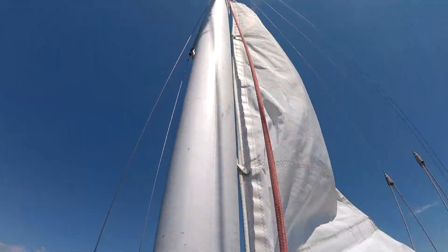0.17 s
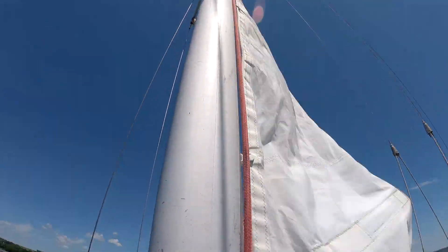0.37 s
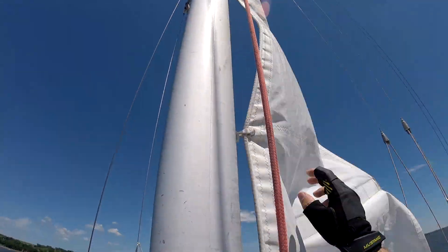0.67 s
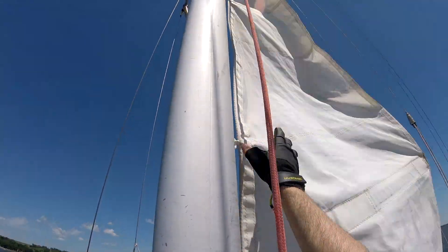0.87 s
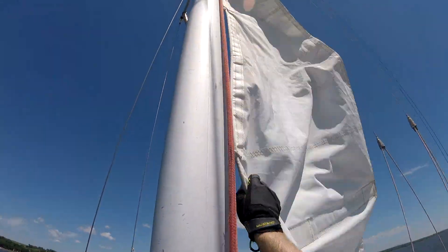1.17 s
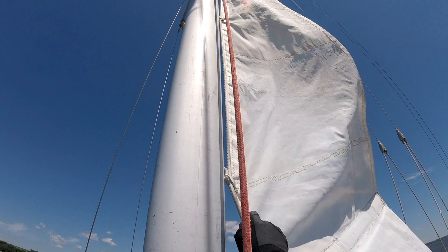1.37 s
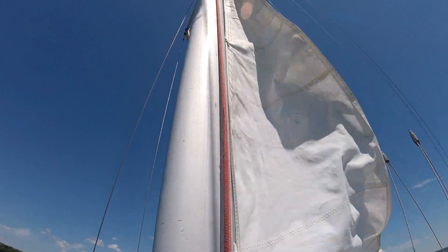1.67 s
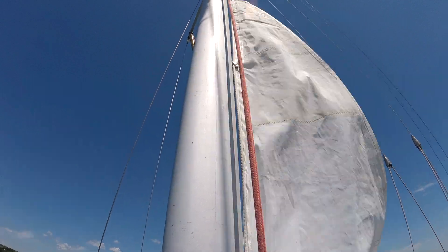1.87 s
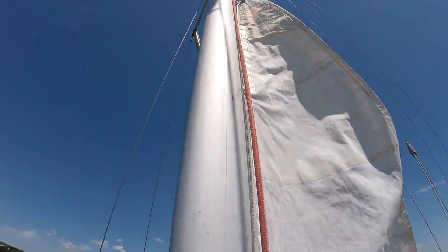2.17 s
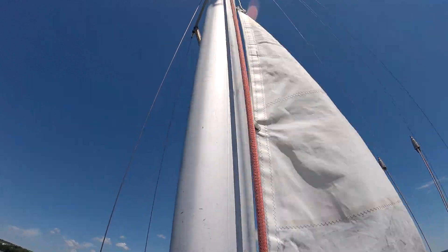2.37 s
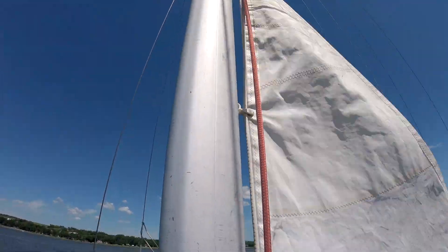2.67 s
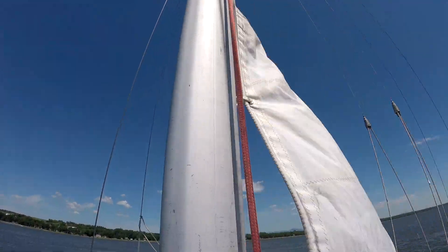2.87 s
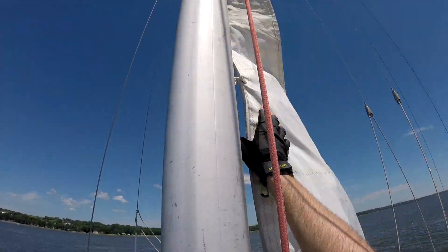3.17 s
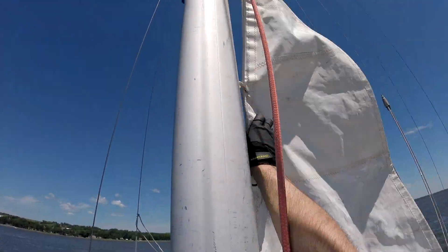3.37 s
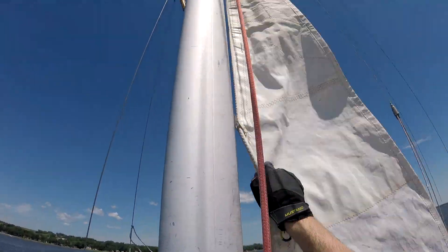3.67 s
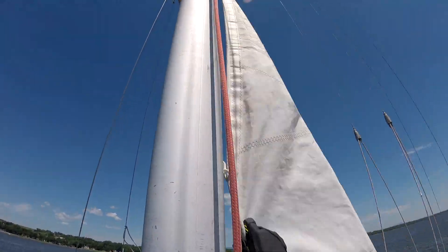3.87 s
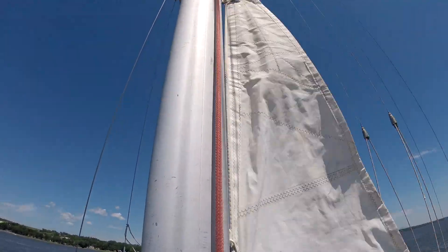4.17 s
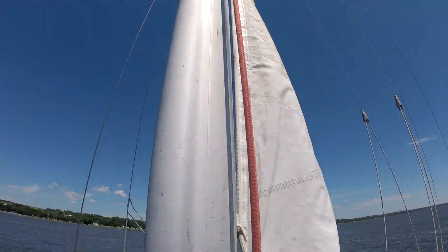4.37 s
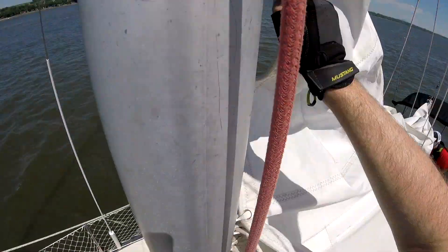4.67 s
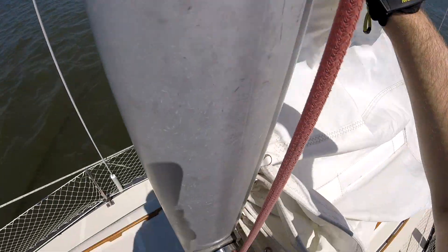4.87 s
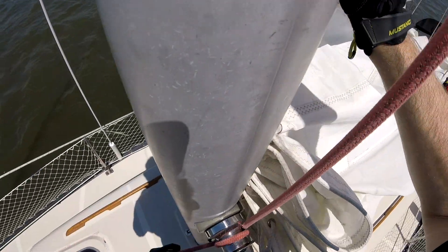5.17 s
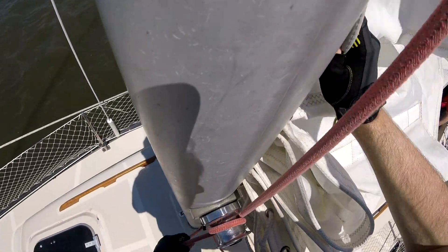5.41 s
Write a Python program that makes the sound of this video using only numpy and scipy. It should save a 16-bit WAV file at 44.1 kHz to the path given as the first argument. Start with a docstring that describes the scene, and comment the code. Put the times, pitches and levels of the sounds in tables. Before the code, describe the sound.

Wind rumbles and buffets on the microphone throughout, out on open water. An arm's length away a sail is pulled down a metal mast: the stiff cloth crinkles, hisses along its track and snaps in quick, uneven flaps, while its slides knock with a faint metallic ring. Near the end the snapping stops and the wind hits the microphone head-on in ragged, crackling gusts.

```python
"""Lowering a sail in a fresh breeze

A sail is hauled down an aluminium mast by hand, an arm's length from the microphone.
Wind rumbles and buffets on the microphone port. Stiff cloth crinkles, hisses down its track
and snaps, and its slides ring the mast. Near the end the microphone turns into the wind
and the flow tears across it."""
import sys
import numpy as np
from scipy import signal
from scipy.fft import rfft, irfft, next_fast_len
from scipy.io import wavfile
from scipy.ndimage import uniform_filter1d, minimum_filter1d, map_coordinates

SR = 44100
rng = np.random.default_rng(int(sys.argv[2]) if len(sys.argv) > 2 else 0)


def waveform_to_disk(signal):
    """Save audio, clipped to [-1, 1], as 16-bit WAV at the path in sys.argv[1]."""
    frames = np.transpose(np.atleast_2d(signal))
    scaled = np.clip(frames, -1, 1) * 32767
    samples = np.round(scaled).astype(np.int16)
    wavfile.write(sys.argv[1], SR, samples)


N = 244314


def undb(db):
    """Decibels to gain."""
    return 10 ** (np.asarray(db) / 20)


def unit(x):
    """Scale to rms 1."""
    return x / np.sqrt(np.mean(x ** 2) + 1e-18)


def gains(table, fade_s=0.02):
    """The dB columns of a curve as gains per sample, fading out beyond its ends."""
    time_s, *columns = np.transpose(table)
    t = np.arange(N) / SR
    inside = np.clip(1 + np.minimum(t - time_s[0], time_s[-1] - t) / fade_s, 0, 1)
    return [inside * undb(np.interp(t, time_s, db)) for db in columns]


def colour(x, points):
    """Minimum-phase filter through (Hz, dB) points; 24 dB per octave down beyond both ends."""
    size = next_fast_len(len(x) + 4096, True) // 2 * 2
    octave = np.log2(np.maximum(np.arange(size // 2 + 1) * SR / size, 1))
    hz, db = np.transpose(points)
    octaves_outside = np.abs(octave - np.clip(octave, np.log2(hz[0]), np.log2(hz[-1])))
    curve_db = np.interp(octave, np.log2(hz), db) - 24 * octaves_outside
    cepstrum = irfft(np.log(undb(curve_db)))
    cepstrum[1:size // 2] *= 2
    cepstrum[size // 2 + 1:] = 0
    response = np.exp(rfft(cepstrum))
    response = unit(np.abs(response)) * np.exp(1j * np.angle(response))
    return irfft(rfft(x, size) * response)[:len(x)]


def band(x, low_hz, high_hz, order=3):
    """Butterworth band-pass."""
    return signal.sosfilt(signal.butter(order, [low_hz, high_hz], "band", fs=SR, output="sos"), x)


def wander(rate_hz):
    """Ramps between random levels, rms 1."""
    step = max(int(SR / rate_hz), 1)
    levels = rng.standard_normal(N)[:N // step + 1]
    return unit(uniform_filter1d(np.repeat(levels, step), step)[:N])


def steady(x, span_s):
    """Hold the local power of a noise near 1."""
    span = int(span_s * SR)
    power = uniform_filter1d(uniform_filter1d(x ** 2, span), span)
    return x / np.sqrt(np.abs(power) + 1e-12)


def clicks(per_s, spread_db):
    """Random clicks, a few much larger than the rest."""
    size = undb(spread_db * np.minimum(rng.exponential(size=N), 4))
    return (rng.random(N) < per_s / SR) * size * np.sign(rng.standard_normal(N))


def chance_events(per_s, curve):
    """Random (start_s, level_db) events within 2 dB of a curve's first level column."""
    gap, scatter = rng.random((100, 2)).T
    start_s = np.cumsum(-np.log(1 - gap)) / per_s
    level_db = np.interp(start_s, *np.transpose(curve)[:2]) + 2 * (2 * scatter - 1)
    return [(s, db) for s, db in zip(start_s, level_db) if s < N / SR]


def add(track, start_s, sound):
    """Mix a sound into a track."""
    i = max(int(start_s * SR), 0)
    track[i:i + len(sound)] += sound[:max(N - i, 0)]


# Wind strength: time_s, small_eddy_db, rumble_db
WIND = [(0.0, -23, -13.5), (0.15, -23.5, -12), (0.62, -24.5, -14), (0.75, -19.5, -13.0), (1.3, -27, -14.0),
        (1.75, -18.5, -12.0), (2.05, -26.5, -14), (2.44, -23.5, -13.0), (2.72, -26.5, -16.5),
        (3.1, -25.5, -15.0), (3.45, -21.5, -11.5), (3.75, -23.5, -14), (4.3, -24.5, -12),
        (4.62, -21.5, -15.5), (4.8, -21.5, -11), (5.0, -22.5, -16.5), (5.17, -16.0, -15.0),
        (5.4, -23.5, -15.0), (5.54, -21, -14)]
# Eddy spectrum: freq_hz, density_db
WIND_SPECTRUM = [(18, 0.5), (27, -7), (38, -2), (52, -4), (80, 0.5), (118, -1), (160, -6.5), (200, -8.5),
                 (260, -11), (340, -17), (480, -25.5), (640, -23), (900, -20), (1400, -33)]


def wind(low_hz=57, high_hz=185):
    """Eddies of three sizes press on the port: the largest only wander, the smallest come in spurts."""
    gust, rumble = gains(WIND)
    large, middle, small = (colour(rng.standard_normal(N), WIND_SPECTRUM) for _ in range(3))
    large = steady(band(large, 21, low_hz), 0.06) * undb(-19 + 1.1 * wander(7.2))
    middle = steady(band(middle, low_hz, 0.952 * high_hz, order=4), 0.085)
    middle *= undb(0.27 + 1.16 * wander(13))
    small = steady(band(small, high_hz, 601) * undb(2.8 * wander(90)), 0.12) * undb(1)
    return large + middle * rumble + small * gust


# Head-on flow: time_s, level_db
HEAD_ON_FLOW = [(5.04, -25.5), (5.13, -21.5), (5.245, -26), (5.28, -14.5), (5.33, -26), (5.39, -24.5),
                (5.48, -19.5), (5.54, -28)]


def head_on(turned_s=5.244, crackle_db=-16, rise_db=8):
    """Gains of the head-on flow and of its crackle, which grows as the port turns into the wind."""
    flow, = gains(HEAD_ON_FLOW)
    turn = np.interp(np.arange(N) / SR, [HEAD_ON_FLOW[0][0], turned_s], [0, 1])
    return flow, flow * undb(crackle_db + rise_db * turn)


# Separating flow spectrum: freq_hz, density_db
TEAR_SPECTRUM = [(250, -9.5), (450, 5), (800, -2), (1400, -3), (2000, -18), (3000, -33), (6000, -34)]
# Wind crackle spectrum: freq_hz, density_db
CRACKLE_SPECTRUM = [(900, -23), (1900, 5), (2800, -7), (4000, -12), (5500, -22), (8000, -34), (12000, -51)]


def tearing_flow(pulse_db=-2):
    """Head-on flow separates at the port in ragged, crackling pulses."""
    flow, crackle_gain = head_on()
    spurts = undb(4 * wander(140))
    pulses = steady(colour(clicks(2500, 6.6) * spurts, TEAR_SPECTRUM), 0.017)
    crackle = steady(colour(clicks(3000, 5.0) * spurts, CRACKLE_SPECTRUM), 0.048)
    return undb(pulse_db) * flow * pulses + crackle_gain * crackle


# Hardest gusts: start_s, level_db, length_s
BUFFETS = [(0.476, -17, 0.038), (1.662, -11, 0.012), (2.428, -14.5, .015), (2.69, -11.5, 0.014),
           (2.725, -17.5, 0.041), (2.94, -12, 0.0094), (2.99, -19, 0.042), (3.088, -12, 0.011),
           (3.137, -13.5, 0.017), (3.157, -12.5, .016), (4.146, -10, 0.037), (4.519, -17, 0.036),
           (4.772, -14, 0.029), (4.828, -24.5, 0.017), (4.86, -9, 0.022), (4.899, -16.5, 0.042),
           (4.944, -6, 0.023), (5.021, -9, 0.02), (5.105, -7.5, 0.01), (5.139, -8, 0.026),
           (5.157, -5, 0.0059), (5.179, -3.5, 0.0085), (5.226, -4.5, 0.0078), (5.261, -23, 0.01),
           (5.296, -11, 0.016)]
# Gust thud spectrum: freq_hz, density_db
BUFFET_SPECTRUM = [(260, -2), (420, 3.5), (750, -3.5), (1100, -10.5), (1600, -18.5)]


def buffets(thud_db=-7.5, crackle_db=10, lesser_per_s=3):
    """Gusts swell and collapse on the port: dull thuds that crackle when they come head-on."""
    swell = np.zeros(N)
    t = np.arange(int(0.1 * SR)) / SR
    lesser = [(s, db - 5.5, 0.025) for s, db in chance_events(lesser_per_s, WIND)]
    for start_s, level_db, length_s in BUFFETS + lesser:
        age = t / max(length_s / 4, 0.001)
        add(swell, start_s - 0.001, undb(level_db) * age * np.exp(1 - age))
    _, crackle_gain = head_on()
    thud = swell * steady(colour(rng.standard_normal(N), BUFFET_SPECTRUM), 0.021)
    crackle = colour(swell * crackle_gain * steady(clicks(1700, 4.1), 0.016), CRACKLE_SPECTRUM)
    return undb(thud_db) * thud + undb(crackle_db) * crackle


def mast_reflection(x, spacing_hz, gain):
    """A sound plus its reflection off the mast: a comb that moves with the microphone."""
    delayed = map_coordinates(x, [np.arange(N) - SR / spacing_hz], order=3)
    return x + gain * delayed


# Hiss following the luff's speed: time_s, level_db
SLIDING = [(0, -39.5), (.5, -46.5), (.58, -57), (.88, -66), (.96, -41), (1.22, -44), (1.75, -39),
           (2.05, -44), (2.7, -45.5), (3.47, -44.5), (3.52, -32), (3.6, -47.5), (3.72, -41.5),
           (4.39, -38.5), (4.53, -52.5), (5.54, -69)]
# Sliding hiss spectrum: freq_hz, density_db
HISS_SPECTRUM = [(3000, -32), (4400, 7), (5200, 8.5), (6500, 6.5), (7500, 0), (9000, -14), (11000, -56),
                 (15000, -30)]
# Mast reflection and thin top hiss: time_s, comb_spacing_hz, top_hiss_db
COMB_AND_TOP_HISS = [(0, 2200, -76), (3.5, 2660, -72.5), (4.05, 2750, -62), (4.55, 2950, -57),
                     (4.8, 3350, -58), (4.97, 3450, -61.5), (5.54, 3230, -66)]
# Top hiss spectrum: freq_hz, density_db
TOP_HISS_SPECTRUM = [(6500, -24.5), (7900, -1), (9600, -3.5), (10400, -6), (11200, -18.5), (12500, -33)]


def sliding_luff(hiss_db=-1.5, top_trim_db=-1):
    """The luff hisses down its track, heard directly and off the mast."""
    slide, = gains(SLIDING)
    time_s, *columns = np.transpose(COMB_AND_TOP_HISS)
    spacing_hz, top_db = (np.interp(np.arange(N) / SR, time_s, column) for column in columns)
    friction = clicks(9000, 6.2) * undb(3.3 * wander(110))
    hiss = undb(hiss_db) * slide * steady(colour(friction, HISS_SPECTRUM), 0.063)
    top_friction = clicks(6000, 4.5) * undb(3.5 * wander(45))
    top_hiss = undb(top_db + top_trim_db) * unit(colour(top_friction, TOP_HISS_SPECTRUM))
    return mast_reflection(hiss, spacing_hz, 0.35) + mast_reflection(top_hiss, spacing_hz, 0.6)


# Modes of mast and slides: pitch_hz, level_db, t60_s
MAST_MODES = [(1655, -5, .3), (1690, -11, .14), (2210, -14, .08), (3064, 0, .23), (3100, -2, .15),
              (3190, -10, .08), (4890, -5, .18), (5150, -14, .08), (6578, -13, .14), (6930, -12, .11)]


def mast_knock():
    """A slide strikes the mast: each contact point favours other modes; cloth damps them unevenly."""
    t = np.arange(int(0.35 * SR)) / SR
    pitch_hz, level_db, t60_s = np.transpose(MAST_MODES)[:, :, None]
    detune, favour, damping, phase = rng.standard_normal((4, len(MAST_MODES), 1))
    modes = np.sin(2 * np.pi * (pitch_hz * (1 + 0.003 * detune) * t + phase))
    decay = np.exp(-np.log(1000) * t / (t60_s * undb(damping)))
    return np.sum(undb(level_db + 1.6 * favour) * modes * decay, axis=0)


# Crumpling strength: time_s, level_db
CRUMPLING = [(0, -29.5), (.18, -34.5), (0.421, -39.5), (.6, -43.5), (0.799, -37), (1.15, -39),
             (1.42, -36.5), (1.83, -30.5), (1.98, -37.5), (2.46, -35), (2.6, -41.5), (3.05, -36.5),
             (3.45, -39), (3.88, -39), (4.08, -46.5), (4.33, -39), (4.40, -45), (5.54, -44.5)]
# Buckling crease spectrum: freq_hz, density_db
CRINKLE_SPECTRUM = [(300, -30.5), (600, 2), (1200, 5), (2000, 2), (3200, 2.5), (4300, -5.5), (6000, -18.5),
                    (7500, -28), (9500, -27.5), (12000, -43), (15000, -58.5)]


def crinkling_cloth(avalanches_per_s=70, decay_s=0.0069, mast_db=-12.5):
    """Creases buckle in little avalanches of clicks and keep the mast ringing faintly."""
    crumpling, = gains(CRUMPLING)
    triggers = np.abs(clicks(avalanches_per_s, 2.6))
    avalanches = signal.lfilter([1], [1, -np.exp(-1 / (decay_s * SR))], triggers)
    creases = crumpling * steady(clicks(3500, 4.4) * (2 + avalanches), 0.098)
    crinkle = colour(creases, CRINKLE_SPECTRUM)
    # folds of changing size favour changing bands
    edges_hz = np.geomspace(300, 15000, 12)
    rustle = sum(band(crinkle, low, high, order=2) * undb(1.6 * wander(70))
                 for low, high in zip(edges_hz, edges_hz[1:]))
    ring = sum(undb(db) * band(creases, hz - 25, hz + 25, order=2) for hz, db, _ in MAST_MODES)
    return np.std(creases) * (unit(rustle) + undb(mast_db) * unit(ring))


# The sail's belly fills: start_s, level_db, pitch_hz
FILLS = [(1.661, -12, 1260), (2.661, -19, 650), (2.694, -18, 800), (2.944, -12, 607), (4.155, -14, 930),
         (4.514, -13.5, 675)]


def belly_fills(attack_s=0.00039, decay_s=0.0026, gain_db=-2):
    """A panel goes taut with a hollow knock: two heavily damped membrane modes."""
    track = np.zeros(N)
    t = np.arange(int(0.04 * SR)) / SR
    envelope = np.exp(-t / decay_s) * (1 - np.exp(-t / attack_s))
    for start_s, level_db, pitch_hz in FILLS:
        phase = 2 * np.pi * pitch_hz * t
        modes = np.sin(phase) + 0.6 * np.sin(1.35 * phase)
        add(track, start_s, undb(level_db + gain_db) * modes * envelope)
    return track


# Sail snaps: start_s, level_db, flutter_decay_s, knock_db, fold_hz, fold_share
SNAPS = [(0.173, -21, 0.028, -35, 2720, .6), (0.3243, -21.5, 0.016, -39, 3700, .2),
         (0.3774, -20.5, 0.018, -38, 2380, 0.16), (0.5102, -24, 0.027, -37, 3070, 0.07),
         (0.541, -20, 0.0076, -43, 2180, 0.9), (0.632, -15, 0.0083, -41, 3180, 0.55),
         (0.6822, -15.5, .01, -38, 4980, 0.27), (0.721, -23.5, 0.011, -37, 2410, 0),
         (0.7797, -22, .012, -39, 2100, .1), (0.828, -16.5, .01, -40, 3500, 0.68),
         (0.9089, -22.5, 0.0046, -50, 2240, 0.85), (1.1071, -15, .0076, -41, 3070, 0.56),
         (1.2244, -13.5, 0.0095, -44, 2870, .25), (1.2384, -18, 0.0063, -31, 3170, .55),
         (1.3121, -21.5, 0.016, -38, 2220, 0.1), (1.3802, -16.5, 0.025, -31.5, 2200, 0.26),
         (1.458, -15, 0.01, -48, 3590, 0.44), (1.5798, -13, 0.0053, -41, 2700, 0.3),
         (1.5933, -16.5, 0.0098, -33, 3530, 0.7), (1.7067, -17.5, 0.024, -43, 3430, 0.25),
         (1.735, -15.5, 0.0041, -38, 3070, .3), (1.7617, -15.5, 0.011, -37, 3360, 0.8),
         (1.838, -20.5, 0.044, -43, 3000, 0.24), (1.985, -19.5, 0.019, -33.5, 2800, 0.3),
         (2.103, -24.5, 0.026, -35.5, 2600, 0.6), (2.2034, -21.5, 0.026, -45, 3160, 0.5),
         (2.245, -16, 0.0057, -33, 3760, 0.9), (2.3256, -14.5, 0.013, -50, 4900, 0.28),
         (2.373, -22, 0.0061, -43, 3070, 0), (2.4512, -23, .005, -45, 2220, 1),
         (2.5631, -18.5, 0.011, -37, 3200, .75), (2.6607, -25, 0.013, -34, 2190, .3),
         (2.691, -17, .0086, -46, 3960, .55), (2.7928, -24, 0.022, -35, 3110, 0),
         (2.8475, -19.5, 0.017, -33.5, 3220, 0.53), (2.941, -21.5, 0.0092, -32, 3060, 0.4),
         (3.2067, -21.5, 0.025, -33, 3080, 0.3), (3.3197, -24, 0.0064, -36.5, 3270, 0.9),
         (3.4943, -14, 0.0084, -28, 3120, .05), (3.5144, -18.5, 0.013, -31.5, 3000, 0),
         (3.5481, -14, 0.011, -36, 2490, 0.3), (3.784, -22.5, 0.031, -48, 3700, 0.44),
         (3.863, -17, 0.0075, -47, 3430, .7), (3.989, -25, 0.059, -37.5, 2340, 0.1),
         (4.133, -13, 0.016, -34, 2200, 0), (4.155, -14.5, 0.0083, -35, 2120, 1),
         (4.1938, -28, 0.011, -37.5, 3120, 0.4), (4.2457, -22, 0.027, -41, 2200, 0),
         (4.3708, -12.5, 0.0052, -30, 3160, 0.88), (4.512, -16, 0.01, -37, 3170, 0.84),
         (4.6675, -24.5, 0.019, -49, 3100, 0.4), (4.6833, -13.5, 0.011, -30, 3030, .05),
         (4.729, -14.5, .011, -35, 3350, 0.94)]
# Snap body spectrum: freq_hz, density_db
SNAP_BODY_SPECTRUM = [(300, 1.5), (800, -1.5), (1600, -2.5), (2600, 2), (3600, 1.5), (4500, -6),
                      (5500, -11.5), (7500, -33.5), (11000, -61)]
# Snap treble spectrum: freq_hz, density_db
SNAP_TREBLE_SPECTRUM = [(3500, -6), (5200, 2), (7000, 1.5), (8200, -6), (10000, -19.5), (12000, -30.5),
                        (14000, -31.5), (15200, -45.5)]


def sail_snaps(gather_s=0.0025, crack_s=0.00062, tail_s=0.035, flaps_per_s=3,
               body_db=-1.5, treble_db=-11.5, fold_db=-6):
    """Cloth gathers, cracks taut and flutters out; the fold rings and a slide knocks on the mast."""
    body, treble, rings = np.zeros((3, N))
    ragged = undb(4.5 * wander(500))
    creases, fibres = (steady(clicks(12000, 3.1) * ragged, 0.0039) for _ in range(2))
    lead_s = 0.01
    t = np.arange(int(0.15 * SR)) / SR - lead_s
    after_s = np.maximum(t, 0)
    gather = np.where(t < 0, 0.29 * np.exp(np.minimum(t, 0) / gather_s), 1)
    crack = undb(-2) * np.exp(-after_s / crack_s)
    tail = undb(-23) * np.exp(-after_s / tail_s)
    # lesser flaps, same columns as SNAPS
    flaps = [(s, db + 11, 0.012, db + 0.5, 3140, 0.17)
             for s, db in chance_events(flaps_per_s, CRUMPLING)]
    for start_s, level_db, decay_s, knock_db, fold_hz, fold_share in SNAPS + flaps:
        flutter = np.exp(-after_s / decay_s)
        envelope = gather * (crack + undb(-4) * flutter + tail)
        bright_db = 0.4 * np.log2(0.01 / decay_s)  # quicker snaps are brighter
        fold_noise = band(rng.standard_normal(len(t)), fold_hz - 160, fold_hz + 160, order=2)
        fold = gather * flutter * steady(fold_noise, 0.006)
        add(body, start_s - lead_s, undb(level_db) * np.sqrt(1 - fold_share) * envelope)
        add(treble, start_s - lead_s, undb(level_db + bright_db) * envelope)
        add(rings, start_s - lead_s, undb(level_db + fold_db) * np.sqrt(fold_share) * fold)
        add(rings, start_s, undb(knock_db + 1) * mast_knock())
    body = undb(body_db) * colour(body * creases, SNAP_BODY_SPECTRUM)
    treble = undb(treble_db) * colour(treble * fibres, SNAP_TREBLE_SPECTRUM)
    return body + treble + band(rings, 1200, 16000)


def scene():
    """Wind and sail on open water: mono, no reverberation."""
    air = wind() + buffets() + tearing_flow()
    sail = crinkling_cloth() + sliding_luff() + sail_snaps() + belly_fills()
    return (air + sail)[None]


def record(dry, ceiling=1.0, hold_s=0.008, cutoff_hz=14900):
    """A limiter eases the gain down around the largest peaks; a steep low-pass follows."""
    hold = int(hold_s * SR)
    needed_gain = ceiling / np.maximum(np.abs(dry), ceiling)
    gain = uniform_filter1d(minimum_filter1d(needed_gain, hold), hold)
    low_pass = signal.ellip(8, 0.2, 70, cutoff_hz, fs=SR, output="sos")
    return signal.sosfilt(low_pass, dry * gain)


dry = scene()
out = record(dry)
waveform_to_disk(out)
```